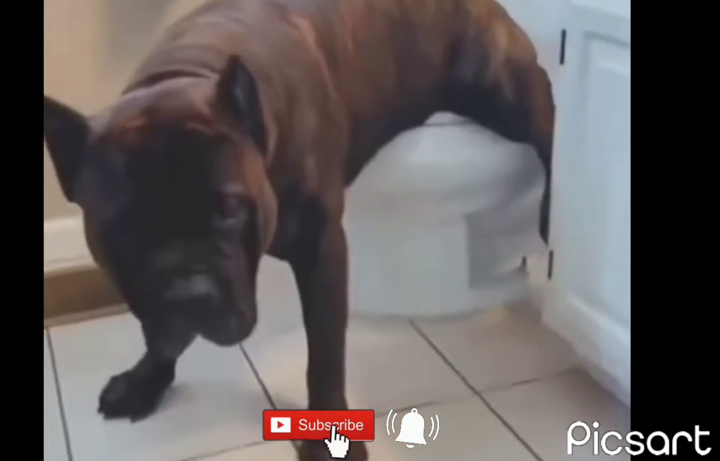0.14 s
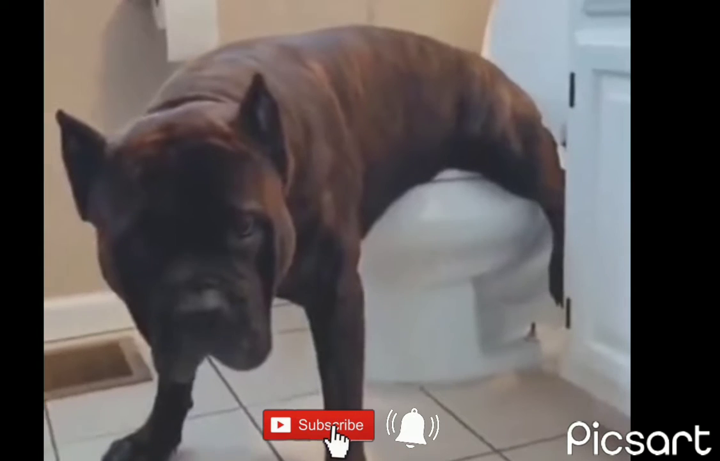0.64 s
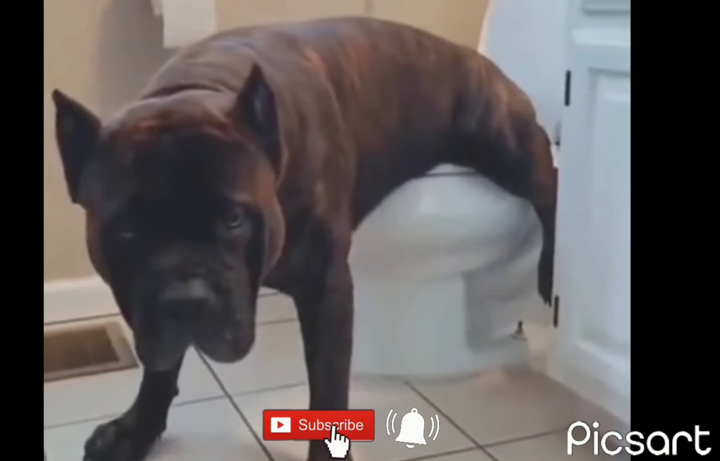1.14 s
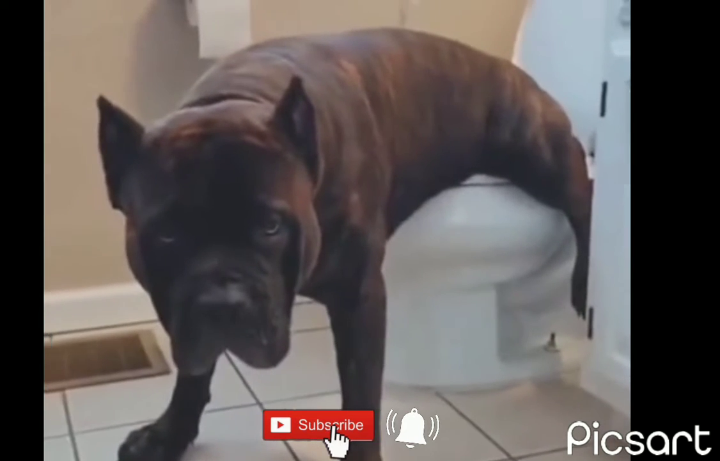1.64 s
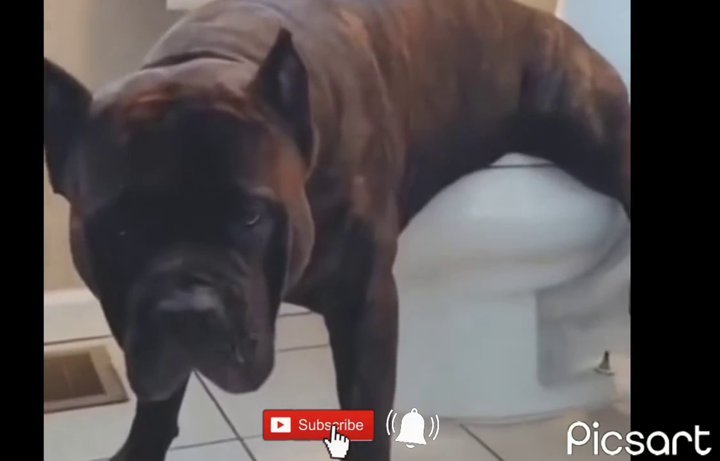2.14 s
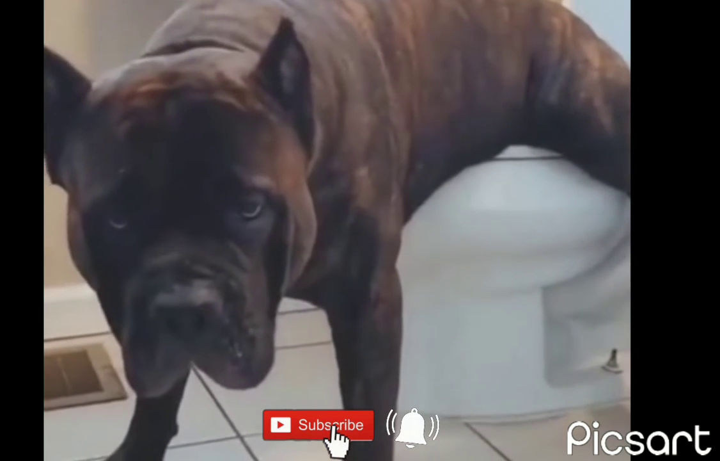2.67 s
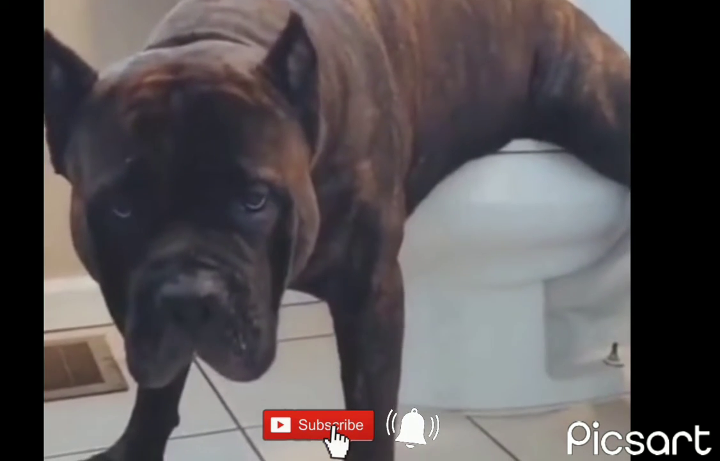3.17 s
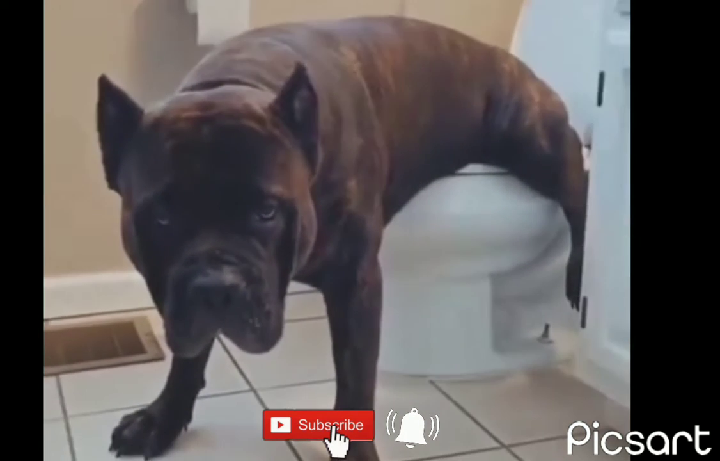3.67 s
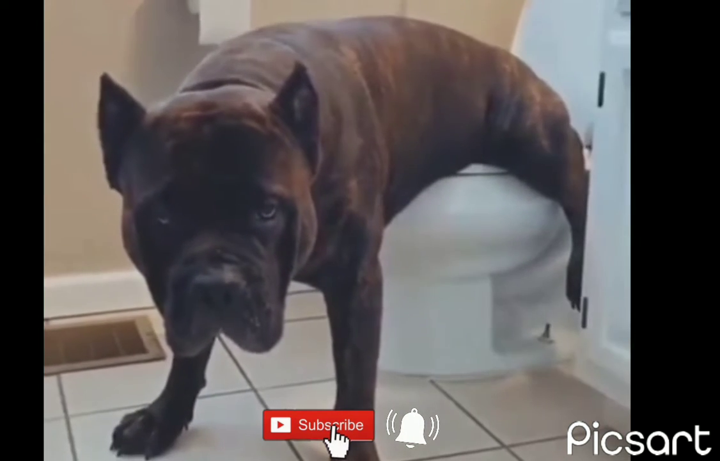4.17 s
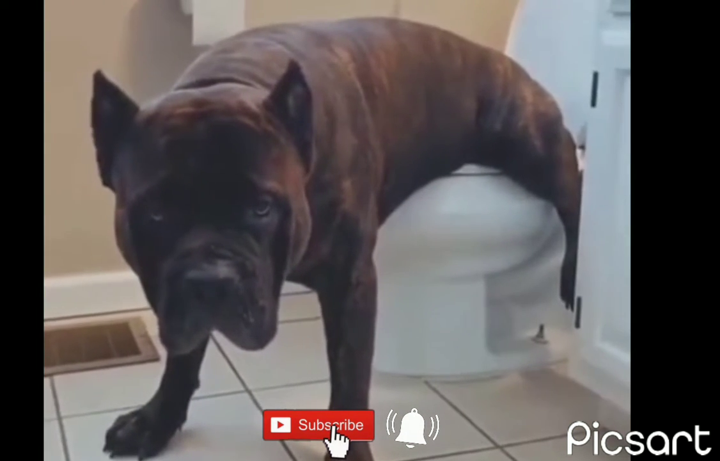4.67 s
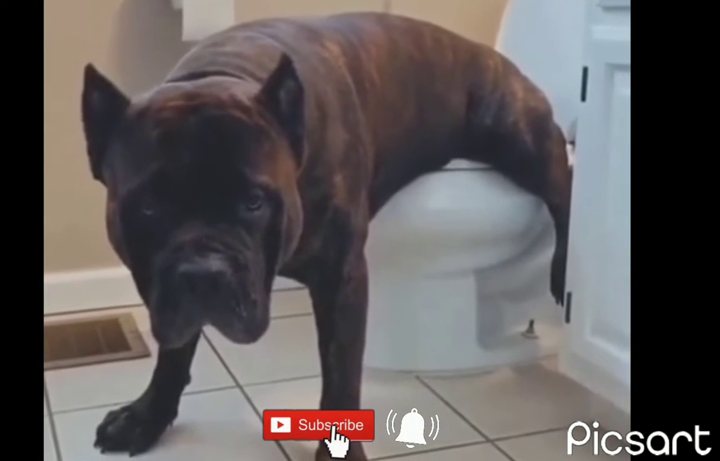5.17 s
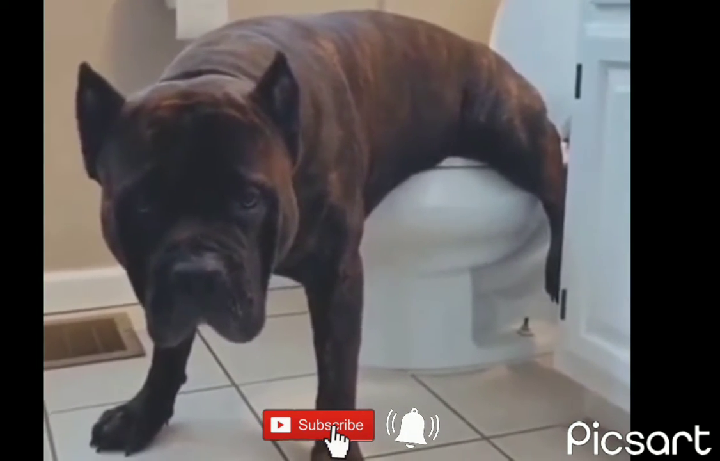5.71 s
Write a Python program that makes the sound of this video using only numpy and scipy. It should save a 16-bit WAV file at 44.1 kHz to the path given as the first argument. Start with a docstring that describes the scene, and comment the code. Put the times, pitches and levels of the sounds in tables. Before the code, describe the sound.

Water rushes and splatters into a ceramic toilet bowl, dies to a few drips, then bursts briefly again in a tiled bathroom.

```python
"""Water in a ceramic toilet bowl

Water rushes and splatters into the bowl, dies away to a few drips, then bursts once more.
Air pockets gulp and small bubbles chatter as damped tones and patchy noise, coloured by the modes of the bowl.
Spray is uneven hiss with a fizz of droplets; plops are single damped sines, slaps and drips puffs of noise.
A fan adds rumbling air and two motor tones; tiled walls answer all the water but the gulps.
The sound is central, its treble blurred in stereo: patches of the right channel are inverted."""
import sys
import numpy as np
from scipy import signal
from scipy.fft import rfft, irfft, dct, next_fast_len
from scipy.io import wavfile
from scipy.ndimage import uniform_filter1d, map_coordinates

SR = 44100
rng = np.random.default_rng(int(sys.argv[2]) if len(sys.argv) > 2 else 0)


def put_to_file(sound):
    """Save the sound as 16-bit audio at rate SR, in the file named by the first command-line argument."""
    columns = np.atleast_2d(sound).T  # one column per channel
    safe = np.clip(columns, -1, 1)
    whole_steps = np.round(safe * 32767)
    wavfile.write(sys.argv[1], SR, whole_steps.astype(np.int16))


def nominal_scale(level):
    """Amplitude ratio for a level in decibels (scalar or array-like)."""
    x = np.asarray(level, float) / 20
    return 10 ** x


N = 256683
T = np.arange(N) / SR

# air noise of the fan, relative spectrum: pitch_hz, gain_db
FAN_AIR = [(12, -43), (20, -11), (60, -6), (90, -9.5), (123, -5.5), (192, -18.5), (846, -32.5), (963, -33),
           (1040, -35.5), (1350, -39.5), (1460, -39.5), (8340, -56), (10000, -53), (13000, -59),
           (22000, -120)]
# motor tones of the fan: pitch_hz, rms_db, waver_knots_per_s
FAN_TONES = [(59.8, -46, 3.4), (119.8, -47.5, 6)]
# decay of the tiled walls: pitch_hz, t60_s
WALL_DECAY = [(200, 0.58), (2000, 0.58), (10000, 0.11)]
# resonances of air and ceramic in the bowl: centre_hz, width_hz, gain_db
BOWL_MODES = [(285.9, 6, 4.5), (356.4, 5.8, 3.5), (393, 5.4, -6), (428, 6.8, 2), (483.6, 14.4, 0.5),
              (549.8, 8.5, 6.5), (600, 11.5, -2.5), (725.3, 17, 3.5), (811, 40, -10), (853.5, 31, -0.5),
              (1110, 12.7, 2.5), (1378, 58, -7), (1440, 15, -8.5), (1693, 33, 0), (1851, 29, -5.5),
              (2150, 50, 1.5), (3330, 13, -5), (3400, 68, -12.5), (3600, 18, 0.5), (4000, 15, -26.5)]
# water supply, steady part: time_s, jet_db, froth_db, upper_bubbles_over_jet_db
SUPPLY = [(0, -32, -42.5, -7), (.6, -31.5, -38.5, -12.5), (.88, -33, -38, -7.5), (1.2, -32.5, -35, -7),
          (1.6, -37, -37.5, -13), (1.9, -33, -36.5, -7), (2.5, -33.5, -39, -5), (3.05, -33, -38.5, -8.5),
          (3.22, -50.5, -47, -0.5), (3.44, -51, -59, -8), (3.66, -60.5, -76.5, -13), (3.8, -66, -71.5, -17),
          (3.94, -62, -70, -1.5), (4.12, -65.5, -59.5, -2), (4.16, -47, -63, -5), (4.183, -37.5, -52, -4),
          (4.2, -19.5, -28.5, -8), (4.22, -24, -33, -5.5), (4.36, -28.5, -43.5, -8),
          (4.53, -28.5, -34.5, -10.5), (4.6, -34.5, -36, -6.5), (4.68, -29.5, -39, -9),
          (4.9, -38, -43.5, -3), (4.95, -48.5, -37, 2.5), (5.06, -51, -53, -8), (5.19, -53, -61.5, -10),
          (5.37, -60.5, -70, -6), (5.82, -63, -60, 9)]
# spurts of the jet: peak_s, added_amplitude_relative_to_steady_db
JET_SPURTS = [(0.048, -3.5), (0.451, -1), (0.548, -7), (0.662, -7.5), (.92, -13.5), (0.991, -6.5),
              (1.07, -6), (1.4, 0), (1.518, 6), (1.642, 3), (1.73, 1), (1.799, 0), (1.858, -8),
              (2.25, -7.5), (2.301, 3), (2.719, 2.5), (2.868, 2), (3.012, -0.5), (4.551, -5.5), (4.871, -7)]
# froth boiling up: peak_s, added_amplitude_relative_to_steady_db
FROTH_BOILS = [(.24, 9), (.34, 9.5), (.55, 0), (.61, -5), (.76, 6), (.92, -8), (.97, -13), (1.2, 8.5),
               (1.27, -3), (1.54, -8), (1.73, 2.5), (1.85, 5), (1.94, -3), (2.03, -2), (2.22, 2), (2.3, -7),
               (2.41, 6.5), (2.59, -6), (2.93, -4), (3.7, 22), (4.6, -1)]
# slaps and drips on the ceramic: start_s, level_db, centre_hz, t60_s, width_octaves
SLAP_EVENTS = [(3.17, -28, 3600, 0.3, .08), (3.241, -31.5, 3400, 0.19, 0.074),
               (3.31, -36, 3400, .15, 0.059), (3.365, -39, 3450, 0.081, 0.041),
               (3.481, -38, 4000, 0.059, 0.074), (3.745, -37, 4500, 0.024, 0.68),
               (3.946, -31, 5960, 0.031, .6), (4.139, -30, 4000, 0.072, 0.56),
               (4.769, -17.5, 3760, 0.09, .06), (4.841, -30.5, 4000, 0.15, 0.056),
               (4.95, -36, 3950, 0.22, 0.073), (5.018, -31, 4470, .1, 0.085),
               (3.689, -29, 1190, 0.06, 0.27), (3.698, -26, 1390, 0.055, 0.17),
               (3.723, -28.5, 890, 0.054, 0.1), (3.722, -31.5, 2040, 0.042, 0.089),
               (3.935, -42, 4030, 0.11, 0.027), (3.938, -34.5, 2600, 0.16, 0.32),
               (3.947, -32, 600, 0.031, 0.52), (0.148, -14.5, 7940, 0.094, 0.087),
               (0.2593, -17, 6100, 0.076, 0.092), (0.306, -13.5, 3310, 0.039, 0.11),
               (0.3436, -12.5, 3520, 0.059, 0.16), (0.413, -5.5, 7580, 0.075, 0.048),
               (0.4464, -16.5, 3320, 0.12, 0.22), (0.538, -12.5, 4130, 0.12, 0.17),
               (0.6127, -10, 5680, 0.11, 0.16), (0.656, -19.5, 5860, 0.07, 0.16),
               (0.956, -20, 6280, 0.057, 0.16), (0.98, -19, 7500, 0.04, 0.16),
               (1.063, -10.5, 6800, 0.035, 0.088), (1.0832, -7, 5100, 0.036, 0.16),
               (1.137, -18.5, 3050, 0.15, 0.25), (1.2161, -18.5, 4280, 0.082, 0.2),
               (1.369, -12.5, 8260, 0.044, 0.16), (1.388, -6.5, 4500, 0.055, 0.12),
               (1.497, -17.5, 4620, 0.049, 0.19), (1.6153, -17, 5830, 0.38, 0.12),
               (1.699, -21, 3460, 0.07, 0.23), (1.7328, -13, 3700, 0.041, 0.19),
               (1.922, -20.5, 5900, 0.097, 0.16), (2.0887, -14, 7800, 0.19, 0.34),
               (2.135, -12.5, 7700, 0.14, 0.26), (2.216, -19.5, 3240, 0.11, 0.12),
               (2.264, -5.5, 4190, 0.054, 0.2), (2.5417, -17.5, 6400, 0.17, 0.088),
               (2.6577, -17.5, 7500, 0.14, 0.2), (2.7, -12, 4400, 0.038, 0.13),
               (2.8534, -15, 3580, 0.064, 0.094), (2.9846, -13.5, 6130, 0.077, 0.13),
               (3.1228, -20.5, 4460, 0.12, 0.24), (3.2205, -31, 3500, 0.097, 0.088),
               (3.2635, -25.5, 3450, 0.13, 0.16), (3.2873, -25.5, 3400, 0.07, 0.12),
               (3.35, -31, 3500, 0.093, 0.14), (3.745, -35, 8530, 0.24, 0.19),
               (3.9461, -31, 3160, 0.027, 0.089), (4.139, -32, 7770, 0.13, 0.38),
               (4.1848, -12.5, 6000, 0.081, 0.15), (4.2042, -10, 3400, 0.29, 0.26),
               (4.2489, -8, 3980, 0.11, 0.28), (4.371, -11, 2880, 0.027, 0.16),
               (4.4492, -12, 5230, 0.13, 0.33), (4.553, 1, 5650, 0.11, 0.25),
               (4.665, -15, 4510, 0.078, 0.17), (4.814, -23, 3800, 0.12, 0.094),
               (4.8718, -12.5, 4160, 0.043, 0.23), (4.9087, -17.5, 4000, 0.07, 0.07),
               (5.0896, -22, 7150, 0.096, 0.1), (5.1922, -34.5, 7220, 0.23, 0.4),
               (5.247, -36.5, 7360, 0.19, 0.23), (5.326, -34.5, 7740, 0.076, 0.37),
               (5.455, -37, 6500, 0.1, 0.42)]
# single bubbles ringing out of the flow, and one knock at 3.695 s rung the same way: start_s, level_db,
# pitch_hz, t60_s
PLOP_EVENTS = [(.156, -12, 393, 0.092), (.231, -14.5, 452, 0.12), (.305, -30, 1351, 0.2),
               (.974, -15, 970, 0.034), (.983, -10, 393, 0.094), (.989, -30.5, 1440, 0.13),
               (1.014, -6.5, 386, 0.07), (1.068, -13, 398, 0.055), (1.19, -22, 710, 0.13),
               (1.494, -22.5, 1440, 0.033), (1.887, -25.5, 1343, 0.13), (1.942, -8.5, 794, 0.026),
               (2.315, -24.5, 1440, 0.12), (2.32, -25, 1594, 0.054), (2.721, -6, 457, 0.034),
               (2.745, -22, 400, .04), (2.777, -10, 428, 0.052), (2.805, -3.5, 440, 0.026),
               (2.855, -24, 1440, 0.027), (2.92, -15.5, 407, 0.062), (3.164, -32.5, 1110, 0.07),
               (3.199, -38, 1105, 0.33), (3.695, -36, 1407, .05), (4.194, -19, 2014, 0.1),
               (4.215, -2.5, 296, 0.11), (4.223, -12.5, 2150, 0.029), (4.314, -8, 287, 0.072),
               (4.389, -38, 1300, 0.099), (4.486, 0.5, 354, 0.092), (4.505, -3.5, 328, 0.018),
               (4.604, -23.5, 1395, 0.047), (4.698, -36, 1110, 0.091), (4.744, -11, 438, 0.037),
               (4.933, -15, 727, 0.081), (4.95, -29.5, 736.5, 0.46)]
# spray filter: pitch_hz, gain_db
SPRAY_SPECTRUM = [(1180, -29.5), (2000, -8), (2540, -12.5), (2840, -3), (3480, -2.5), (4410, -1),
                  (5370, -3), (6010, 2.5), (6630, -2.5), (8030, 3), (9650, -4), (12500, -40.5),
                  (21200, -120)]
# small-bubble filter: pitch_hz, gain_db
CHATTER_SPECTRUM = [(290, -36.5), (500, -11), (733, 4.5), (1200, -13), (1400, -3.5), (1560, -13),
                    (3000, -13.5), (3900, -39.5), (6600, -120)]
# air pockets leaving the trap: peak_s, level_db, fall_time_s, pitch_hz
AIR_POCKETS = [(0, -20, 0.044, 402), (.15, -32.5, 0.088, 387), (0.243, -29.5, 0.058, 438),
               (0.366, -34.5, .05, 469), (0.503, -32, 0.046, 336), (0.577, -29, 0.058, 474),
               (.74, -35.5, 0.11, 463), (0.991, -35.5, 0.075, 381), (1.362, -37.5, 0.074, 474),
               (1.465, -43, 0.036, 440), (1.785, -41.5, .09, 433), (1.942, -42, 0.035, 373),
               (2.04, -42, .04, 430), (2.226, -38, 0.11, 455), (2.354, -34, 0.088, 359),
               (2.614, -31, 0.16, 428), (2.718, -30.5, 0.042, 414), (2.801, -28.5, 0.033, 414),
               (2.918, -31, 0.059, 392), (3.056, -34, 0.095, 458), (3.263, -45.5, 0.069, 464),
               (3.371, -43, .04, 580), (3.67, -54.5, 0.082, 419), (3.96, -52.5, 0.028, 455),
               (4.223, -22.5, 0.032, 318), (4.361, -25.5, .14, 318), (4.462, -20, 0.047, 325),
               (4.595, -33, 0.12, 350), (4.756, -29, 0.079, 428), (4.857, -40.5, 0.056, 415),
               (5.408, -65, 0.23, 420)]
# chance that a patch may be inverted: pitch_hz, share (0 to 1)
INVERTED_SHARE = [(4100, 0.0016), (4300, .2), (5500, .35), (6800, .35), (7200, 0.24), (8200, .35),
                  (9700, 0.2)]


def unit(x):
    """Normalisation: the signal scaled to rms 1."""
    return x / np.sqrt(np.mean(x ** 2) + 1e-20)


def along(points, hz):
    """Interpolation of (Hz, value) points on a logarithmic frequency axis."""
    f, v = np.transpose(points)
    return np.interp(np.log(hz + 1), np.log(f + 1), v)


def curves(rows):
    """Linear interpolation: one value per sample for each column after the time."""
    s, *columns = np.transpose(rows)
    return [np.interp(T, s, column) for column in columns]


def wobble(rate):
    """Random modulation: a smooth curve through rate Gaussian knots a second, at most 59."""
    knots = rng.standard_normal(int(T[-1] * 60) + 4)
    return map_coordinates(knots, [T * min(rate, 59)])


def filtered(x, response):
    """Linear filtering: the spectrum times a complex response of frequency."""
    size = next_fast_len(N + SR // 2)
    hz = np.fft.rfftfreq(size, 1 / SR)
    return irfft(rfft(x, size) * response(hz), size)[..., :N]


def steady(x, seconds):
    """Levelling by running rms: slow level changes divided out, fast ones kept."""
    power = uniform_filter1d(x ** 2, int(seconds * SR))
    return x / np.sqrt(np.abs(power) + 1e-12)


def patchy(depth_db):
    """Turbulent noise: its gain drifts in patches of time and frequency; rms 1."""
    z = signal.stft(rng.standard_normal(N + 512), nperseg=512)[2]
    across_hz = uniform_filter1d(rng.standard_normal(z.shape), size=4, axis=0)
    field = unit(uniform_filter1d(across_hz, size=6, axis=1))
    return unit(signal.istft(z * nominal_scale(depth_db * field), nperseg=512)[1][:N])


def swells(s, db, length):
    """Transient envelopes, one a row on a coarse grid: a rounded rise, an exponential fall."""
    u = (T[::64] - s[:, None]) / np.reshape(length, (-1, 1))
    rise = np.exp(-(u / 0.697) ** 2)
    fall = np.exp(-np.abs(u))
    return nominal_scale(db)[:, None] * np.where(u < 0, rise, fall)


def smooth(x):
    """Linear interpolation of a coarse control to every sample."""
    return np.interp(T, T[::64], x)


def rings(s, gain, hz, t60, rise, attack, length):
    """Damped oscillation, softly started over attack cycles; pitch climbs by the share rise per t60."""
    t = np.arange(length) / SR
    hz, t60 = hz[:, None], t60[:, None]
    phase = 2 * np.pi * hz * t * (1 + rise * t / t60 / 2)
    decay = nominal_scale(-60 * t / t60)
    soft_start = 1 - np.exp(-t * hz / attack)
    wave = gain[:, None] * np.sin(phase) * decay * soft_start
    at = np.round(s * SR).astype(int)[:, None] + np.arange(length)
    return np.bincount(at.ravel(), wave.ravel(), N + length)[:N]


def bubbles(count, centre_hz, octaves, cycles, size_db, length):
    """Bubble statistics: random times, pitches scattered round the centre, exponential levels in dB; rms 1."""
    u = rng.random(count)
    hz = centre_hz[(u * N).astype(int)] * 2 ** (octaves * rng.standard_normal(count))
    hz = np.clip(hz, 100, 11000)
    # sizes are capped: no bubble towers over the rush
    size = np.minimum(rng.exponential(size=count), 3)
    return unit(rings(u * T[-1], nominal_scale(size_db * size), hz, cycles / hz, rise=0.056, attack=1.48, length=length))


def tail(t60s, seconds):
    """Diffuse reverberation: a noise tail of energy 1, each frequency dying at its own speed."""
    hz, t, z = signal.stft(rng.standard_normal(int(seconds * SR)), SR, nperseg=256)
    decay = nominal_scale(-60 * t / along(t60s, hz)[:, None])
    x = signal.istft(z * decay, SR, nperseg=256)[1]
    return x / np.linalg.norm(x)


def tiled(x, wet):
    """Room response by convolution: the sound with the answer of the tiled walls."""
    return x + wet * signal.fftconvolve(x, tail(WALL_DECAY, 0.45))[:N]


def bowl(x, direct):
    """Modal resonance: second-order modes of the bowl, alternating in sign, ring beside the direct sound."""
    def response(f):
        total = direct
        for k, (centre, width, db) in enumerate(BOWL_MODES):
            damping = 1j * f * width
            total = total + (-1) ** k * nominal_scale(db) * damping / (centre ** 2 - f ** 2 + damping)
        return total
    return filtered(x, response)


def fan():
    """Broadband flow noise with motor tones wavering in level and phase."""
    rumble = filtered(patchy(depth_db=1.5), lambda f: nominal_scale(along(FAN_AIR, f)))
    out = nominal_scale(-42.5) * unit(rumble)
    for hz, db, rate in FAN_TONES:
        level = nominal_scale(db + 0.5 * wobble(rate)) * np.sqrt(2)  # rms to peak
        out = out + level * np.sin(2 * np.pi * hz * T + 2.12 * wobble(rate))
    return out


def slaps():
    """Impact noise: each slap or drip is a band of noise, cracking at first contact and soon gone."""
    out, t = np.zeros(N + SR), np.arange(4096) / SR
    f = np.fft.rfftfreq(len(t), 1 / SR)
    crack = 1 + 0.32 * np.exp(-t / 0.0017)
    onset = 1 - np.exp(-t / 0.00053)
    for s, db, hz, t60, octaves in SLAP_EVENTS:
        band = 1 / (1 + (np.log2(f / hz + 1e-9) / octaves) ** 2)
        puff = unit(irfft(rfft(rng.standard_normal(len(t))) * band))
        # 12.5 dB: fixed level trim of all puffs
        decay = nominal_scale(db - 12.5 - 60 * t / t60)
        out[round(s * SR):][:len(t)] += decay * crack * onset * puff
    return out[:N]


def plops():
    """Bubble resonance: each single bubble, and the one knock, is a damped tone of slightly rising pitch."""
    s, db, hz, t60 = np.transpose(PLOP_EVENTS)
    # 2.5 dB: fixed level trim of all plops
    return rings(s, nominal_scale(db + 2.5), hz, t60, rise=0.053, attack=3.8, length=SR // 2)


def jet():
    """Amplitude envelope of the jet: its steady gain raised by short spurts."""
    spurts = swells(*np.transpose(JET_SPURTS), 0.03)  # fall time in s
    return nominal_scale(curves(SUPPLY)[0]) * (1 + smooth(spurts.sum(0)))


def spray():
    """Amplitude-modulated noise: a fizz of droplets in a patchy hiss that spits unevenly with the jet."""
    fizz = bubbles(count=6000, centre_hz=np.full(N, 5500.0), octaves=0.55, cycles=120.0, size_db=4.5, length=600)
    spitting = nominal_scale(1.8 * wobble(16.0) + 1.97 * wobble(45.0))
    hiss = spitting * (patchy(depth_db=4.5) + 0.45 * fizz)
    coloured = filtered(hiss, lambda f: nominal_scale(along(SPRAY_SPECTRUM, f)))
    rung = tiled(bowl(coloured, direct=1.0), wet=0.58)
    return jet() * steady(rung, seconds=0.091)


def chatter():
    """Bubble ensemble in a resonator: the lower band follows the froth, the upper one the jet."""
    _, froth_db, upper_db = curves(SUPPLY)
    boils = swells(*np.transpose(FROTH_BOILS), 0.021)  # fall time in s
    froth = nominal_scale(froth_db + wobble(12.0)) * (1 + smooth(boils.sum(0)))
    small = bubbles(count=3000, centre_hz=np.full(N, 1300.0), octaves=0.731, cycles=25.0, size_db=3.0, length=1000)
    source = 0.6 * small + patchy(depth_db=3.0)
    coloured = filtered(source, lambda f: nominal_scale(along(CHATTER_SPECTRUM, f)))
    water = tiled(bowl(coloured, direct=0.4), wet=0.4)
    low = filtered(water, lambda f: 1 / (1 + (f / 1250.0) ** 8))
    upper = jet() * nominal_scale(upper_db + 1.2 * wobble(14.0))
    return froth * steady(low, seconds=0.16) + upper * steady(water - low, seconds=0.14)


def gulps():
    """Bubble resonance in the trap: air pockets burst, their level-weighted mean setting the pitch."""
    s, db, length, hz = np.transpose(AIR_POCKETS)
    pockets = swells(s, db, length)
    # air carried by the froth between pockets, centred on 420 Hz
    seep = nominal_scale(curves(SUPPLY)[1] - 6.5)
    level = seep + smooth(pockets.sum(0))
    pitch_hz = (seep * 420 + smooth(hz @ pockets)) / level
    air = bubbles(count=900, centre_hz=pitch_hz, octaves=0.1954, cycles=31.0, size_db=-1.0, length=2200)
    churn = filtered(patchy(depth_db=1.5), lambda f: f ** 4 / (f ** 4 + 173.0 ** 4) / (1 + (f / 400.0) ** 4))
    rung = bowl(air + 0.48 * unit(churn), direct=0.26)
    # the hollow is too small to sound below its lowest mode
    hollow = filtered(rung, lambda f: f ** 8 / (f ** 8 + 203.0 ** 8))
    return level * steady(hollow, seconds=0.1)


def treble_inverted(x):
    """Polarity inversion in patches of time and frequency above 4.1 kHz, in finer strips below 6.9 kHz."""
    hop, lead = 1024, 47 + 1024
    blocks = np.pad(x, (lead, 3 * hop - (N + lead) % hop)).reshape(-1, hop)
    window = np.sin(np.pi / 2 * np.sin(np.pi * (np.arange(2 * hop) + 0.5) / (2 * hop)) ** 2)
    a, b, c, d = np.split(np.hstack([blocks[:-1], blocks[1:]]) * window, 4, axis=1)
    # overlapping blocks folded into a cosine transform keep their energy whatever the signs
    lines = dct(np.hstack([-c[:, ::-1] - d, a - b[:, ::-1]]), type=4, norm="ortho")
    k = np.arange(hop)
    hz = k * SR / (2 * hop)
    patch = rng.random((len(lines), 32))[:, k // 32]
    strip = rng.random((len(lines), 128))[:, k // 8]
    turned = (patch < along(INVERTED_SHARE, hz)) & (hz > 4100) & ((strip < 0.5) | (hz > 6900))
    # inverted lines also scatter in level by 1 dB
    opposite = -lines * nominal_scale(rng.normal(0, 1, lines.shape))
    p, q = np.split(dct(np.where(turned, opposite, lines), type=4, norm="ortho"), 2, axis=1)
    unfolded = np.hstack([q, -q[:, ::-1], -p[:, ::-1], -p]) * window
    first, second = np.split(unfolded, 2, axis=1)
    return (second[:-1] + first[1:]).ravel()[lead - hop:][:N]


def scene():
    """Superposition: water in the tiled room over the fan, all from the middle."""
    impacts = tiled(slaps() + plops(), wet=0.27)
    mid = fan() + impacts + spray() + chatter() + gulps()
    return np.array([mid, mid])


def band_limit(x):
    """A steep low-pass at the top of the band."""
    return signal.sosfilt(signal.butter(12, 10340, fs=SR, output="sos"), x)


def record(dry):
    """Band limitation: a sharp low-pass at 9720 Hz, then treble patches of the right channel are inverted."""
    left, right = filtered(dry, lambda hz: hz < 9720)
    mix = np.array([left, treble_inverted(right)])
    return band_limit(mix)


dry = scene()
out = record(dry)
put_to_file(out)
```